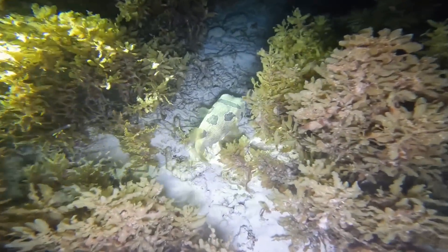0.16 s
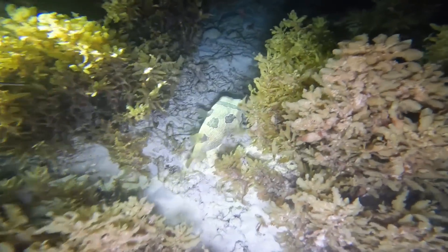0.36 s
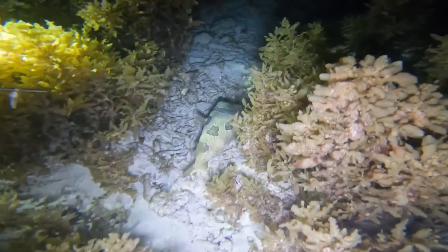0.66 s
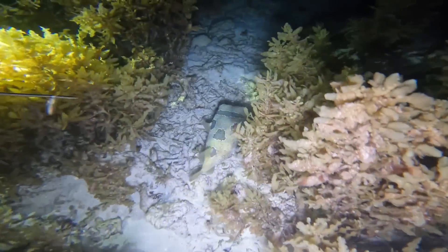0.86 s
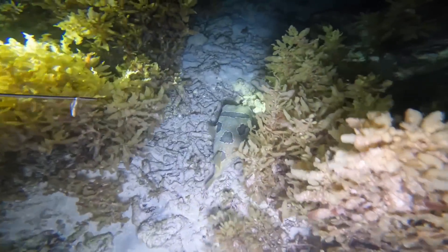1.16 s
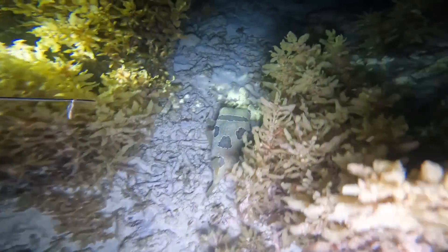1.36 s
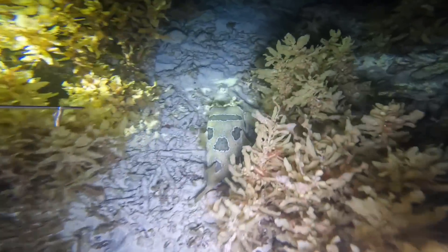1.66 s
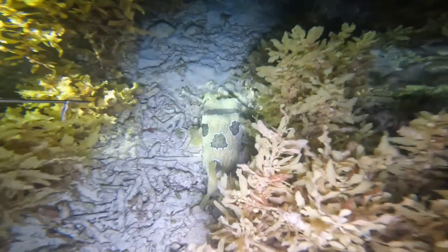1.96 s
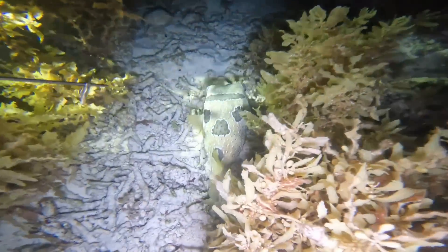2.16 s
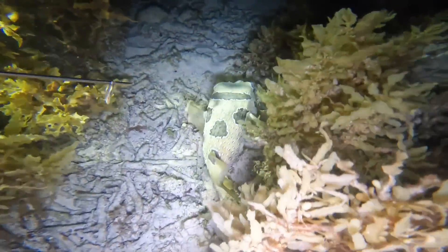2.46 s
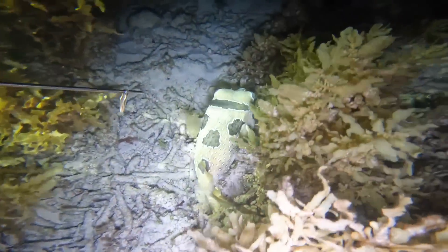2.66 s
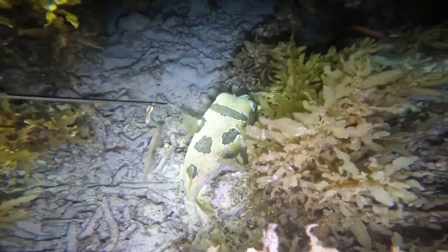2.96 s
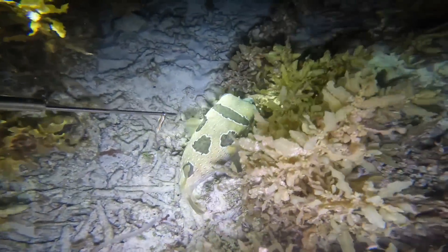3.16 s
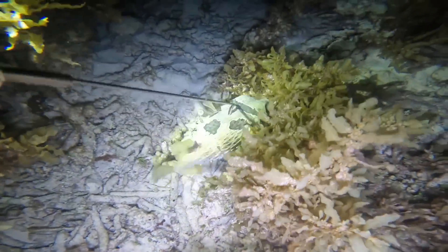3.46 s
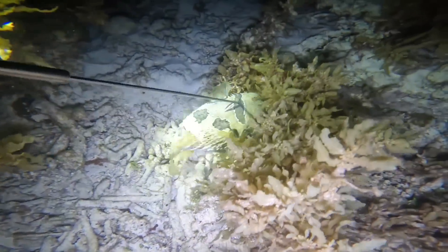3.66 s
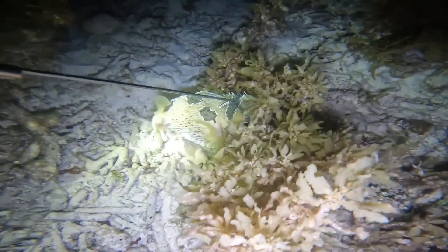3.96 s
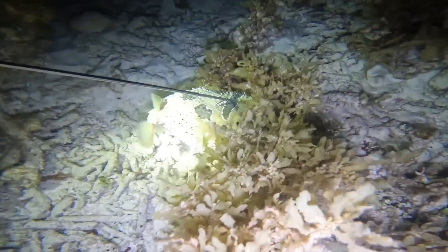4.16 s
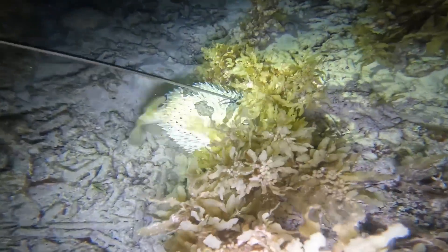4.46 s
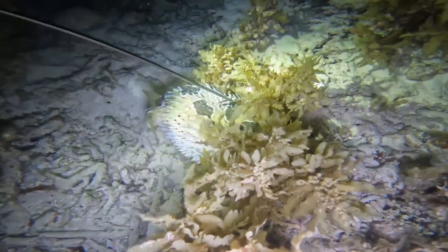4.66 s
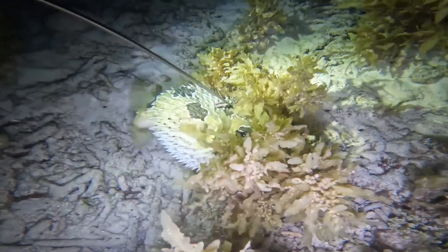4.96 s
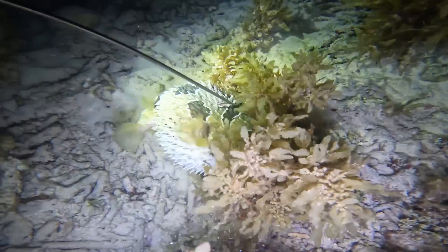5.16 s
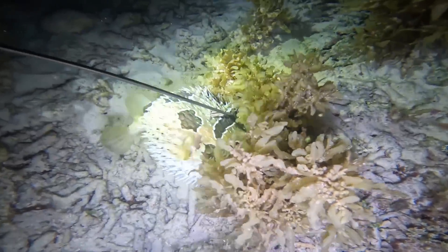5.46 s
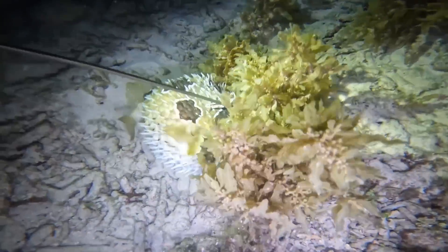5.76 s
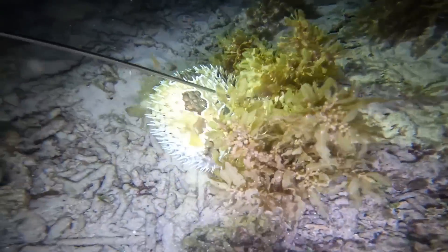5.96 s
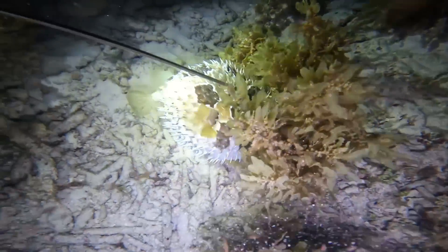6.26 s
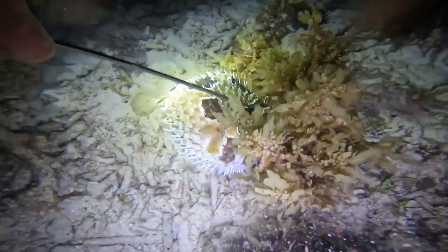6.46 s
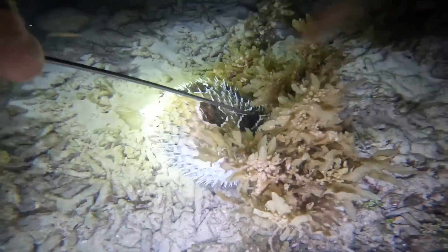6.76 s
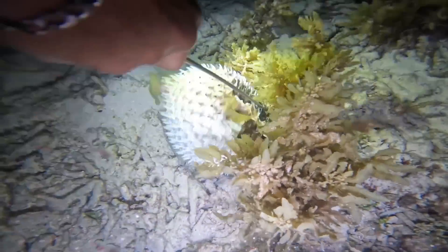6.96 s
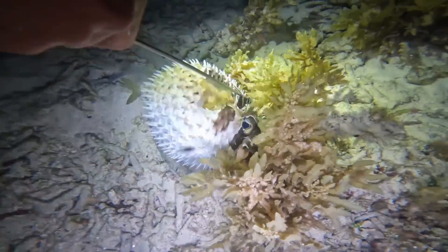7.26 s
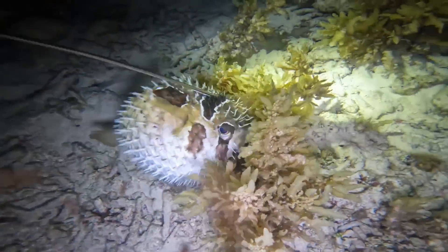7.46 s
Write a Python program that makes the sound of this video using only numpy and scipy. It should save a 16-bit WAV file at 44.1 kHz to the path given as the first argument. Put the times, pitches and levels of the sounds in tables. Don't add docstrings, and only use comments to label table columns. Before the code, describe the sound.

Muffled, close underwater sound inside a camera housing. Low rumbling swells and two hollow, gulping notes slosh irregularly, with light dull ticks and soft scrapes. A heavy thud and rattling rod strike break in midway, then it quiets. Thuds, knocks, hard taps and snaps return more strongly over far shrimp crackle and bubbly hiss. Nearly mono at first, it gradually widens to stereo.

```python
import sys
import numpy as np
from scipy import signal
from scipy.fft import rfft, irfft, next_fast_len
from scipy.io import wavfile
from scipy.ndimage import map_coordinates

SR = 44100
rng = np.random.default_rng(int(sys.argv[2]) if len(sys.argv) > 2 else 0)


def decibels_to_gain(level_db):
    exponent = np.asarray(level_db, float) / 20
    return 10 ** exponent


def dump(signal):
    limited = np.clip(np.atleast_2d(signal).T, -1, 1)
    pcm = np.round(limited * 32767).astype(np.int16)
    wavfile.write(sys.argv[1], SR, pcm)


N = 335601

# start_s, level_db
STIR = [(0, 5.5), (.19, 5.5), (.35, 0), (1.1, 1.5), (1.76, -6.5), (2.18, 4), (2.5, -0.5), (2.7, -7.5),
        (3.3, -3), (3.52, 1), (3.62, -13), (4.34, -13.5), (4.7, 0), (4.85, 2), (5.24, 3), (5.47, 0),
        (7.1, 4), (7.61, -5.5)]
# pitch_hz, width_hz, level_db
DULL_SHELL = [(1352, 390, 5), (1648, 447, 6), (2100, 710, 3.5), (2910, 320, 4.5), (3407, 910, -2)]
# pitch_hz, width_hz, level_db
BRIGHT_SHELL = [(4220, 2000, -6), (4800, 790, 5.5), (5440, 800, 5), (6554, 920, 4), (7380, 450, 4)]


def unit(x):
    return x / np.sqrt(np.mean(x ** 2) + 1e-20)


def along(points, hz):
    f, v = np.transpose(points)
    return np.interp(np.log(hz + 1), np.log(f + 1), v)


def curves(rows):
    s, *columns = np.transpose(rows)
    return [np.interp(np.arange(N) / SR, s, column) for column in columns]


def wobble(rate):
    knots = rng.standard_normal(int(N * rate / SR) + 4)
    return map_coordinates(knots, [np.arange(N) * rate / SR])


def bell(s, half_s):
    steps = np.arange(N // 64 + 1) * 64 / SR
    return np.repeat(np.exp(-((steps - s) / half_s) ** 2), 64)[:N]


def filtered(x, response):
    m = next_fast_len(N + SR // 4)
    return irfft(rfft(x, m) * response(np.fft.rfftfreq(m, 1 / SR)), m)[..., :N]


def modes(table, f):
    total = 0
    for k, (hz, width_hz, db) in enumerate(table):
        loss = 1j * f * width_hz
        total = total + (-1) ** k * decibels_to_gain(db) * loss / (hz * hz - f * f + loss)
    return total


def below(f, hz, order):
    return (1 / (1 - (f / hz) ** 2 + np.sqrt(2) * 1j * f / hz)) ** order


def above(f, hz, order):
    return (-(f / hz) ** 2) ** order * below(f, hz, order)


def dull(f, table=DULL_SHELL):
    return modes(table, f) * above(f, 1010, order=2) * below(f, 9100, order=1)


def bright(f, table=BRIGHT_SHELL):
    return modes(table, f) * above(f, 4400, order=1) * below(f, 9500, order=3)


def leak(f):
    return above(f, 8400, order=2) * below(f, 7100, order=1)


def grains(rate, spread_db, t60):
    strength_db = spread_db * np.minimum(rng.exponential(size=N), 2.5)
    hits = (rng.random(N) < rate / SR) * decibels_to_gain(strength_db)
    fade = decibels_to_gain(-60 * np.arange(SR // 8) / SR / max(t60, 1e-3))
    return unit(signal.fftconvolve(hits, fade)[:N] * rng.standard_normal(N))


def surge():
    # start_s, level_db
    swell_points = [(0.0, -34), (0.17, -22), (1.14, -22.5), (1.76, -14), (2.05, -24), (2.5, -15.5),
                    (3.73, -27), (6.23, -17), (6.55, -16), (6.85, -20), (7.61, -18)]
    # pitch_hz, level_db
    swell_colour = [(2.4, -23.5), (4.0, -2.5), (21, -1.5), (40, -13.5), (52, -25), (88, -120)]
    rumble_colour = [(25, -43.5), (35, -8), (60, 1.5), (90, 2), (120, -15.5), (170, -12.5), (250, -52)]
    # start_s, peak_db, pitch_hz
    thumps = [(0.022, -15.5, 85.4), (0.114, -14.5, 32.4), (0.501, -20, 44.7), (0.944, -17.5, 35),
              (1.469, -16.5, 24.6), (2.371, -20, 65), (3.398, -9, 75.6), (3.42, -4.5, 140),
              (3.887, -13.5, 75.3), (4.282, -22, 57.2), (4.481, -14, 55.2), (4.917, -15.5, 47.4),
              (5.328, -17, 117), (5.804, -16.5, 81), (6.924, -10, 59), (7.148, -7.5, 60.8),
              (7.345, -8, 73.4)]
    swell_db, = curves(swell_points)
    rumble_db = -29.5 + 1.12 * np.arange(N) / SR - 0.25 * (swell_db - swell_db.mean())
    swell = unit(filtered(rng.standard_normal(N), lambda f: decibels_to_gain(along(swell_colour, f))))
    lumps = decibels_to_gain(3.5 * wobble(4.1))
    rumble = unit(lumps * filtered(rng.standard_normal(N), lambda f: decibels_to_gain(along(rumble_colour, f))))
    out = np.pad(decibels_to_gain(swell_db) * swell + decibels_to_gain(rumble_db - 8.0) * rumble, (0, SR))
    t = np.arange(SR // 8) / SR
    for s, db, hz in thumps:
        push = decibels_to_gain(db + 2.5 - 8.3 * (hz * t - .4) ** 2)
        out[round(s * SR):][:len(t)] += push * np.sin(2 * np.pi * hz * t)
    return out[:N]


def trapped_air():
    # pitch_hz, width_hz, level_db
    low_air = [(175, 126, -6.5), (213.3, 29, 1), (275, 25, 3)]
    high_air = [(350, 13, -1), (412, 28.8, 4), (504, 25.2, 0.5), (520, 24, -2), (726, 140, -24)]
    # start_s, half_width_s, low_note_db, high_over_low_db
    sloshes = [(0.023, 0.013, -22.5, 2), (0.086, 0.029, -25, 12.5), (0.184, 0.029, -28, -4.5),
               (0.322, 0.044, -22.5, 2.5), (.42, 0.037, -38, 1), (.53, 0.075, -34, 7.5),
               (0.711, 0.041, -36, 3), (0.828, 0.04, -42.5, 8.5), (0.939, 0.045, -30.5, 0.5),
               (1.028, 0.017, -35.5, -1.5), (1.103, 0.039, -19, -4), (1.182, 0.024, -26.5, 2),
               (1.26, 0.042, -17.5, 0), (1.491, 0.075, -37, 1.5), (1.586, 0.029, -26.5, -6.5),
               (1.7, 0.036, -25, 1), (1.779, 0.027, -22, 2), (1.88, 0.02, -30, -1),
               (1.981, 0.047, -32, 4.5), (2.17, 0.055, -30.5, 5.5), (2.326, 0.088, -27.5, 1),
               (2.939, 0.026, -59, 24), (3.145, 0.031, -32.5, 7), (3.329, 0.03, -31, 5),
               (3.447, 0.058, -17, -6), (3.54, 0.033, -42.5, 14), (3.622, 0.022, -21.5, 6.5),
               (3.76, 0.044, -26, -0.5), (4.07, 0.2, -38, -3), (4.469, 0.012, -31, 0),
               (4.779, 0.086, -35.5, 3), (4.898, 0.014, -21, -15), (4.96, 0.063, -50.5, 20.5),
               (5.145, 0.065, -28.5, 5), (5.35, 0.045, -33, 8), (5.643, 0.025, -22.5, 3),
               (5.739, 0.051, -23, -6), (5.899, 0.062, -29, -2.5), (6.153, 0.095, -25, -15.5),
               (6.362, 0.085, -29, 7), (6.5, 0.044, -37, 0.5), (6.741, 0.027, -29.5, -10),
               (6.836, 0.036, -18, -10.5), (6.933, 0.03, -16, -4), (7.058, 0.097, -23, 1),
               (7.15, 0.014, -46, 9), (7.248, 0.047, -40, 9.5), (7.33, 0.022, -25, -20),
               (7.45, 0.07, -37.5, -8.5)]
    # start_s, low_note_db, low_pitch_hz, high_over_low_db, t60_s
    low_bumps = [(.306, -8, 264, -21, 0.2), (1.058, -31, 207, -2.5, 0.051), (1.23, -18, 216, -5.5, 0.45),
                 (1.688, -12.5, 277.5, -18, 0.4), (1.956, -20.5, 245, 1, 0.28),
                 (2.082, -7.5, 236, -21, 0.084), (2.252, -8, 233, -14, 0.089),
                 (3.376, -19, 231, 10.5, 0.056), (3.427, 2.5, 253, -1.5, 0.083),
                 (3.999, -13, 279, -18.5, 0.25), (4.644, 3.5, 229.4, -20.5, 0.2),
                 (4.646, -17, 281, -13.5, 0.29), (5.317, -20, 275, 3.5, 0.27),
                 (5.499, -22.5, 343, -1.5, 0.19), (6.731, 7.5, 157, 0.5, 0.014),
                 (6.923, 6.5, 275, -2, 0.037)]
    # start_s, low_note_db, high_pitch_hz, high_over_low_db, t60_s
    high_bumps = [(0.067, -15.5, 453, -5.5, 0.44), (0.173, -9, 425, 2, 0.075), (0.518, -19, 500, 2.5, 0.12),
                  (1.381, -9, 407, 2.5, 0.11), (2.51, -32.5, 450, 15, 0.14), (1.241, -12, 412, 7, 0.051),
                  (1.273, -26, 443, 0, 0.098), (3.598, -21.5, 394, 8, 0.044), (3.735, -25, 421, 8.5, 0.23),
                  (3.298, -26.5, 412, 6.5, 0.36), (3.399, -7, 430, 19.5, 0.02),
                  (3.618, -24, 403, 5.5, 0.29), (3.819, -12.5, 415, 2, 0.16), (5.111, -26, 412, 17, 0.12),
                  (5.799, 6.5, 350, 0, 0.036), (5.817, -20, 436, 16, 0.093), (6.999, -28, 538, 23.5, 0.11),
                  (7.022, -20.5, 524, 10.5, 0.26)]
    low_note_hz, high_note_hz = 254.8, 418.5
    stir_db, = curves(STIR)
    idle = decibels_to_gain(-43 + 0.83 * stir_db) * np.ones((2, 1))
    heave = idle + sum(decibels_to_gain([[db], [db + tilt_db]]) * bell(s, half_s) for s, half_s, db, tilt_db in sloshes)
    jolts = grains(70, spread_db=2, t60=0.072) + .75 * rng.standard_normal(N)
    jolts = jolts * decibels_to_gain(2 * wobble(25))
    low = unit(filtered(
        jolts, lambda f: modes(low_air, f) * above(f, 60, order=1) * below(f, 312, order=2)))
    high = unit(filtered(
        jolts, lambda f: modes(high_air, f) * above(f, 280, order=1) * below(f, 600, order=2)))
    out = np.pad(heave[0] * low + heave[1] * high, (0, SR))
    t = np.arange(SR // 3) / SR
    bumps = [(s, db, hz, high_note_hz, *rest) for s, db, hz, *rest in low_bumps]
    bumps += [(s, db, low_note_hz, *rest) for s, db, *rest in high_bumps]
    for s, db, low_hz, high_hz, high_db, t60 in bumps:
        ring = np.sin(2 * np.pi * low_hz * t)
        ring += decibels_to_gain(high_db + 6.0 - 25 * t / t60) * np.sin(2 * np.pi * high_hz * t)
        onset = 1 - np.exp(-(1.07 * low_hz * t) ** 2)
        out[round(s * SR):][:len(t)] += decibels_to_gain(db - 2.0 - 60 * t / t60) * onset * ring
    return out[:N]


def knocks():
    # start_s, peak_db, pitch_hz, t60_s
    contacts = [(2.585, -37, 1080, 0.022), (3.397, -15, 600, 0.038), (3.425, -13.5, 800, 0.04),
                (4.642, -54, 850, 0.048), (5.298, -29, 1065, 0.099), (5.5, -33, 613, 0.13),
                (5.626, -35.5, 700, 0.11), (5.797, -7.5, 600, 0.09), (6.298, -26.5, 1055, 0.017),
                (6.927, -38, 706, 0.069), (7.257, -20.5, 1080, 0.0099), (7.524, -26, 990, 0.057)]
    out, t = np.zeros(N + SR), np.arange(4096) / SR
    f = np.fft.rfftfreq(len(t), 1 / SR)
    for s, db, hz, t60 in contacts:
        blow = decibels_to_gain(-60 * t / t60) * rng.standard_normal(len(t))
        knock = irfft(rfft(blow) * modes([(hz, 200, 0)], f) ** 2)
        out[round(s * SR):][:len(t)] += decibels_to_gain(db) * knock / np.abs(knock).max()
    return out[:N]


def all_clicks():
    # start_s, peak_db, pitch_hz, t60_s
    taps = [(0.0152, -9, 2100, 0.023), (0.142, -18, 1420, 0.049), (0.2157, -19.5, 2100, 0.045),
            (0.46, -26.5, 1420, 0.064), (1.25, -22.5, 2040, 0.026), (1.586, -19.5, 2030, 0.047),
            (1.717, -23, 1410, 0.081), (2.1384, -23, 1330, 0.047), (2.589, -19.5, 2075, 0.031),
            (2.9826, -23.5, 1360, 0.071), (3.1472, -18, 1850, 0.03), (4.415, -23.5, 1550, 0.043),
            (4.4804, -18.5, 2220, 0.023), (4.767, -28.5, 2600, 0.11), (4.8252, -20, 1300, 0.039),
            (5.1527, -17.5, 1830, 0.055), (5.2952, -11.5, 1920, 0.053), (5.321, -17, 1740, .056),
            (5.6276, -8.5, 1820, 0.017), (5.6462, -17, 1730, 0.061), (5.7517, -22.5, 1800, 0.061),
            (6.098, -3.5, 1725, 0.026), (6.2982, -11, 1890, 0.035), (6.3832, -17, 1560, 0.024),
            (6.3975, -12, 1800, 0.048), (6.5598, -26, 2900, 0.048), (6.9277, -6, 2480, 0.019),
            (7.0636, -7, 1660, 0.022), (7.2572, -9, 1960, 0.026), (7.5284, -15.5, 1450, 0.02)]
    # start_s, peak_db, pitch_hz, bright_share_db
    jabs = [(3.3688, -39, 2100, -2), (3.3783, -23, 1500, -7), (3.397, -5, 1250, -15),
            (3.4001, -7, 2100, -5.5), (3.414, -4, 2100, -4.5), (3.428, -17, 1200, -15),
            (3.443, -31, 2200, -2), (3.455, -18.5, 2180, -9), (3.4756, -22, 2060, -15),
            (3.462, -25, 1590, -14), (3.49, -29, 1860, 10), (3.526, -30, 1900, 11), (3.561, -32, 1910, -6),
            (3.566, -39, 1900, 16), (3.499, -19.5, 1610, -3), (3.506, -24, 2100, 1), (3.543, -22, 1910, -5),
            (3.5922, -12.5, 1710, -4.5), (3.6014, -14, 1880, 13), (3.6137, -3, 2160, -1),
            (3.62, -9, 2140, 9), (3.627, -15.5, 1360, -22), (3.7282, -13.5, 1880, -3),
            (3.8166, -8.5, 1460, -2.5), (3.981, -22, 1770, -21), (3.989, -16.5, 2100, 5),
            (4.117, -27.5, 1360, -4), (4.278, -31, 2050, -7)]
    # start_s, peak_db, bright_share_db
    snaps = [(0.029, -16, 25), (0.305, -30, 7), (0.5, -18, -4), (1.292, -24.5, 11), (2.413, -14, 9.5),
             (2.439, -23.5, -4), (2.7307, -32.5, 10.5), (4.3888, -25.5, -0.5), (4.6397, -29, -19),
             (5.0604, -20.5, -7), (5.125, -21, -6.5), (5.251, -22.5, -2.5), (5.405, -16, -4.5),
             (5.5008, -14, -11), (5.852, -27, 6), (5.999, -25.5, 4.5), (6.443, -34, 6), (6.459, -23, -9),
             (6.5817, -26.5, 18), (6.686, -26.5, -4), (6.731, -19.5, -9.5), (6.749, -27, -7),
             (6.7824, -1, 2.5), (7.1353, -25.5, 16), (7.274, -14, -11), (7.4715, -20, 3), (7.5097, -25, 0)]
    # start_s, peak_db, pitch_hz
    ticks = [(0.0573, -44, 1410), (0.079, -35, 1390), (.138, -25, 1470), (0.536, -29, 1330),
             (0.934, -32.5, 2070), (1.114, -28.5, 1310), (1.3734, -37.5, 3000), (1.428, -31, 1300),
             (1.565, -37.5, 1360), (1.694, -39, 1390), (1.7063, -28, 2030), (1.7573, -34, 1450),
             (2.011, -32, 2100), (2.1198, -37, 1390), (2.165, -28, 1890), (2.079, -48, 2830),
             (2.179, -37, 1910), (2.205, -41, 1500), (2.248, -32, 1300), (2.2982, -28.5, 1380),
             (2.361, -35, 1960), (2.6823, -43, 2740), (2.9092, -36.5, 1400), (2.925, -40.5, 1350),
             (3.0757, -38.5, 3100), (3.228, -47, 2050), (3.266, -38, 2100), (3.31, -31.5, 2380),
             (3.329, -35, 2570), (3.368, -30, 1510), (3.803, -29.5, 1490), (4.051, -30, 1990),
             (4.094, -42, 2000), (4.126, -33.5, 1350), (4.293, -32, 1750), (4.565, -42, 1830),
             (4.7, -33.5, 2800), (4.735, -37, 1900), (4.782, -36, 3100), (4.925, -41, 1700),
             (5.012, -37, 1760), (5.036, -31, 1780), (5.209, -29, 1660), (5.5972, -33, 1580),
             (5.7074, -39, 1600), (5.901, -33.5, 1620), (5.9549, -33, 1600), (6.0422, -42, 1500),
             (6.054, -26.5, 1460), (6.147, -33.5, 2840), (6.2378, -28.5, 2640), (6.8586, -35.5, 1590),
             (6.917, -19, 1610), (6.9724, -35, 1500), (6.9945, -32, 1600), (7.009, -29, 1350),
             (7.027, -27, 1650), (7.092, -42, 1500), (7.113, -31, 1570), (7.446, -38.5, 1700)]
    # start_s, peak_db
    spits = [(0.391, -47), (0.519, -30), (0.574, -35), (0.624, -35.5), (.66, -45), (0.756, -37),
             (0.873, -43), (1.023, -39.5), (1.175, -43), (1.617, -39), (2.66, -37), (2.865, -41),
             (3.1283, -29.5), (3.71, -28), (4.02, -28), (4.228, -40), (4.255, -42), (4.525, -43),
             (4.589, -40), (4.607, -43), (4.6644, -25.5), (4.6861, -28.5), (4.8635, -26), (5.1712, -23),
             (5.33, -24), (5.355, -40), (5.655, -22.5), (5.727, -32), (5.4658, -32), (5.5124, -23),
             (5.77, -26), (5.9863, -32), (6.331, -33), (6.701, -26), (6.713, -36), (7.21, -30), (7.33, -33),
             (7.518, -38), (7.566, -49)]

    def near(hz):
        return hz * np.exp(0.15 * rng.standard_normal())

    clicks_list = [(s, db, hz, -19, t60) for s, db, hz, t60 in taps]
    clicks_list += [(s, db, hz, share_db, 0.07) for s, db, hz, share_db in jabs]
    clicks_list += [(s, db, near(1550), share_db, 0.043) for s, db, share_db in snaps]
    clicks_list += [(s, db, hz, -15, 0.064) for s, db, hz in ticks]
    clicks_list += [(s, db, near(1650), -1, 0.043) for s, db in spits]
    return clicks_list


def varied(shell):
    return [(hz * np.exp(rng.normal(0, .04)), .4 * width_hz, db + rng.normal(0, 3.5))
            for hz, width_hz, db in shell]


def clicks():
    out, t = np.zeros(N + SR), np.arange(4096) / SR
    f = np.fft.rfftfreq(len(t), 1 / SR)
    for s, db, hz, bright_db, t60 in all_clicks():
        rattle = decibels_to_gain(4 * np.repeat(rng.standard_normal(64), 64)) * rng.standard_normal(len(t))
        rattle[2] += 5
        rebound_s = .006 + 0.0078 * rng.random()
        rattle *= 1 + 2.1 * rng.random() * np.exp(-((t - rebound_s) / 0.0017) ** 2)
        low, high = varied(DULL_SHELL), varied(BRIGHT_SHELL)
        note = modes([(hz, 170, 9)], f) + decibels_to_gain(-14.5) * dull(f, low) * below(f, 1400, order=2)
        body = dull(f, low) * below(f, 3300, order=1)
        edge = decibels_to_gain(bright_db + 12) * (bright(f, high) + decibels_to_gain(-6.5) * leak(f))
        slow = (decibels_to_gain(-60 * t / t60) + decibels_to_gain(-24.0 - 20 * t / t60)) * rattle
        medium = decibels_to_gain(-110 * t / t60) * rattle
        fast = decibels_to_gain(-150 * t / t60) * rattle
        click = irfft(rfft(slow) * note + rfft(medium) * body + rfft(fast) * edge)
        out[round(s * SR):][:len(t)] += decibels_to_gain(db) * click / np.abs(click).max()
    return out[:N]


def blips(table, rate, cycles, spread_db, count):
    draw, normal = rng.random((count, 3)), rng.standard_normal((count, 2))
    start = np.minimum(np.cumsum(-np.log(draw[:, 0]) / rate) * SR, N).astype(int)
    chosen = (draw[:, 1] * len(table)).astype(int)
    hz = np.array(table)[chosen, 0] * np.exp(0.049 * normal[:, 0])
    k = np.arange(SR // 100)
    turns = hz[:, None] * k / SR
    life = cycles * np.exp(0.53 * normal[:, 1:])
    ring = np.sin(2 * np.pi * turns) * turns / life * np.exp(-turns / life)
    ring *= decibels_to_gain(spread_db * np.minimum(-np.log(draw[:, 2:]), 2))
    return unit(np.bincount((start[:, None] + k).ravel(), ring.ravel(), N + SR)[:N])


def crackle():
    # start_s, half_width_s, dull_db, bright_db
    scrapes = [(0.02, 0.016, -25.5, -43), (0.511, 0.02, -40.5, -38), (0.871, 0.025, -51.5, -59),
               (1.245, 0.029, -44, -55), (2.27, 0.14, -49.5, -62.5), (3.42, 0.028, -27, -34),
               (3.5, 0.04, -36, -59), (3.615, 0.016, -30, -42), (4.76, 0.08, -47.5, -52.5),
               (4.91, 0.02, -47, -69), (5.159, 0.041, -40, -62), (7.018, 0.035, -27.5, -31.5),
               (7.099, 0.036, -41, -44.5)]
    # pitch_hz, width_hz, level_db
    wall_modes = [(800, 260, 2), (1080, 83, 3)]
    stir_db, = curves(STIR)
    t = np.arange(N) / SR
    rub = sum(decibels_to_gain([[low_db], [high_db]]) * bell(s, half_s) for s, half_s, low_db, high_db in scrapes)
    shared = grains(45, spread_db=4.0, t60=0.036) + 0.17 * grains(220, spread_db=0.5, t60=0.012)
    flutter_db = 4 * wobble(40) + 3 * np.array([wobble(25), wobble(25)])
    hiss = decibels_to_gain(flutter_db + 3 * wobble(7)) * rng.standard_normal((2, N))
    rubbing = decibels_to_gain(3 * wobble(120) + 2 * wobble(35)) * rng.standard_normal(N)

    low_blips = blips(DULL_SHELL, 160, cycles=7.5, spread_db=2.5, count=1400)
    high_blips = blips(BRIGHT_SHELL, 160, cycles=7.3, spread_db=4.5, count=1400)
    low = .5 * shared + 0.2 * low_blips + 0.25 * hiss[0]
    high = .5 * shared + 0.11 * high_blips + 0.14 * hiss[1]
    fizz = decibels_to_gain(-58 + 1.3 * stir_db + 2.5) * unit(filtered(low, lambda f: dull(f) ** 2))
    fizz += decibels_to_gain(-63.5 + 0.47 * stir_db + 1.4 * t + 2.0) * unit(filtered(high, bright))
    fizz += decibels_to_gain(-68 + 0.66 * stir_db) * unit(filtered(shared + 0.6 * hiss[0], leak))

    narrow = [(hz, width_hz / 2, db) for hz, width_hz, db in DULL_SHELL]
    dull_rub = unit(filtered(rubbing, lambda f: dull(f, narrow) ** 2 * below(f, 2200, order=2)))
    bright_rub = unit(filtered(rubbing, lambda f: bright(f) ** 2 + decibels_to_gain(-1.0) * leak(f)))
    swells = rub[0] * dull_rub + rub[1] * bright_rub
    gaps = decibels_to_gain(3 * np.minimum(wobble(22), .5))
    wall = unit(filtered(rubbing, lambda f: modes(wall_modes, f) ** 2))
    wall_level = gaps * decibels_to_gain(-71.5 + 0.99 * stir_db) + decibels_to_gain(-13.5) * rub[0]
    return gaps * fizz + swells + wall * wall_level


def scene():
    # pitch_hz, lead_radians
    lead = [(60, 0), (225, -.12), (280, -.38), (520, -.28), (800, -1), (1400, -.5), (2900, -.75),
            (4000, -.08)]
    # pitch_hz, left_over_right_db
    lean = [(60, .6), (280, .9), (520, 2.4), (2600, 3.2), (4300, -3.2), (6500, -3), (8500, 1.5)]
    # pitch_hz, level_db
    apart_colour = [(60, -48), (300, -32), (600, -13.5), (1200, -4), (2500, -4.5), (5000, -8.5),
                    (8000, -13.5), (14000, -3.5)]
    # start_s, share_of_port_difference
    opening = [(.85, 0.012), (1.3, .1), (2.3, 0.51), (4.3, 0.85), (7.6, 1)]
    case = surge() + trapped_air() + knocks() + clicks() + crackle()
    sign = np.array([[1], [-1]])
    shared = filtered(
        case, lambda f: decibels_to_gain(sign * along(lean, f) / 2) * np.exp(sign * 1j * along(lead, f) / 2))
    paths = rng.standard_normal((3, SR // 50)) * decibels_to_gain(-60 * np.arange(SR // 50) / SR / .01)
    scattered = signal.fftconvolve(case[None], paths / np.linalg.norm(paths), axes=1)[:, :N]
    own = sum(wobble(39) * path for path in scattered)
    apart = (shared[0] - shared[1]) / 2 + filtered(own, lambda f: decibels_to_gain(along(apart_colour, f)))
    return shared.mean(axis=0) + sign * curves(opening)[0] * apart


def patchy_top(x):
    # pitch_hz, level_db
    top_colour = [(8000, -1), (10500, -4), (12800, 2), (13200, -2), (15000, 3)]
    hz, _, z = signal.stft(x, SR, nperseg=1024)
    frames = z.shape[2]
    blocks = rng.standard_normal((33, frames // 2 + 1))
    blocks = np.repeat(np.repeat(blocks, 16, axis=0), 2, axis=1)[:len(hz), :frames]
    patches = np.repeat(rng.standard_normal((65, frames)), 8, axis=0)[:len(hz)]
    holes = patches / 2 + blocks < -.75
    gain_db = 6.5 * np.minimum(blocks, 1) - 20 * holes + along(top_colour, hz)[:, None]
    gain = decibels_to_gain(gain_db) * (1 + 0.64 * rng.standard_normal(z.shape))
    share = np.clip(hz / 7900 - 1, 0, .2)[:, None] * 5
    z = z * (1 + .09 * (hz > 900)[:, None] * rng.standard_normal(z.shape[1:]))
    z = z * (1 - share + share * gain) * (hz < 15800)[:, None]
    return signal.istft(z, SR, nperseg=1024)[1][:, :N]


def low_pass(x):
    return signal.sosfilt(signal.butter(12, 16270, fs=SR, output="sos"), x)


def record(dry):
    clipped = dry / (1 + np.abs(dry) ** 12) ** (1 / 12)
    dulled = filtered(clipped, lambda f: below(f, 6920, order=2))
    return low_pass(patchy_top(dulled))


dry = scene()
out = record(dry)
dump(out)
```